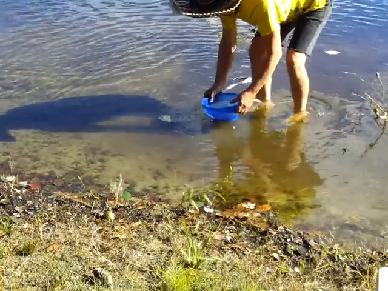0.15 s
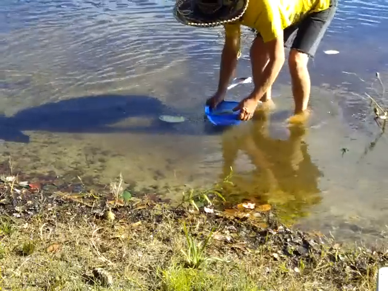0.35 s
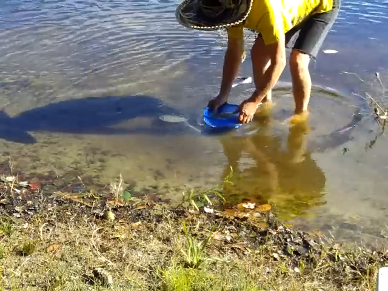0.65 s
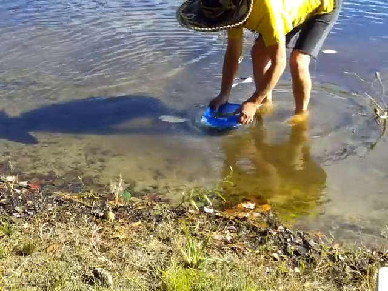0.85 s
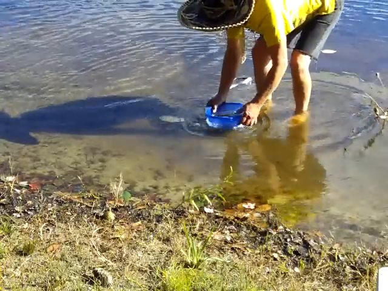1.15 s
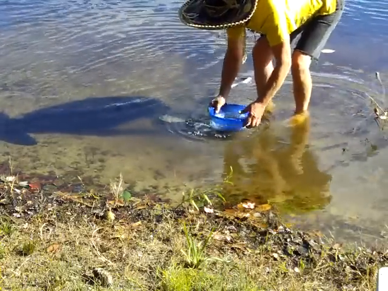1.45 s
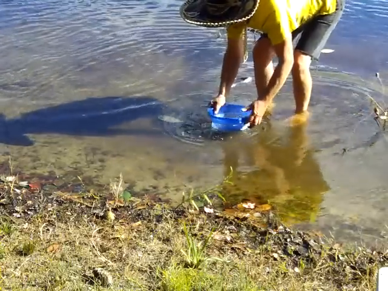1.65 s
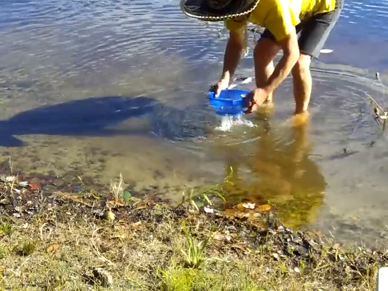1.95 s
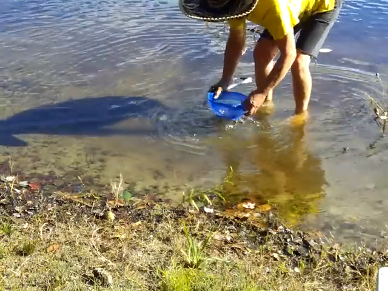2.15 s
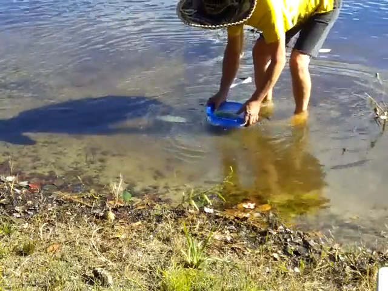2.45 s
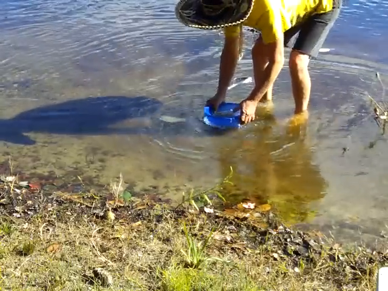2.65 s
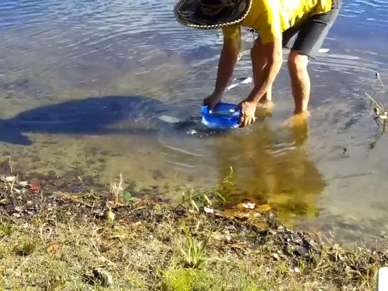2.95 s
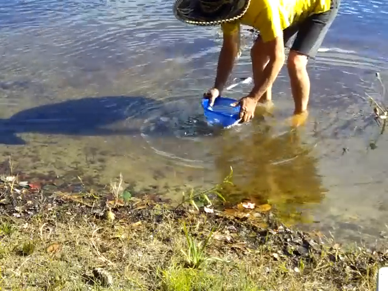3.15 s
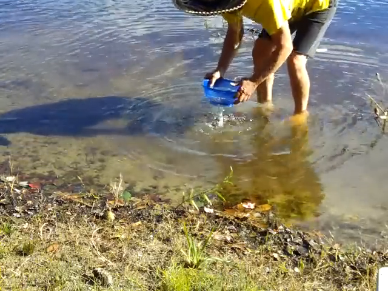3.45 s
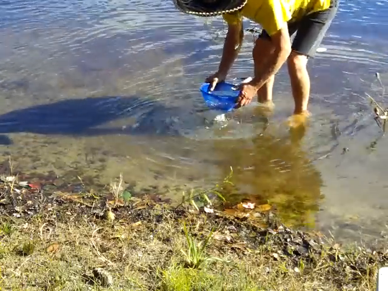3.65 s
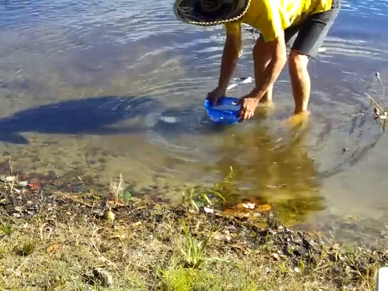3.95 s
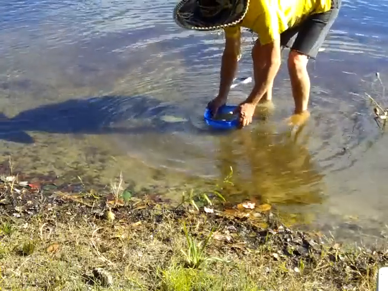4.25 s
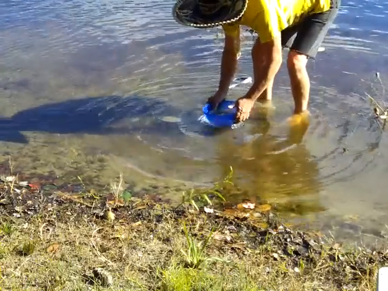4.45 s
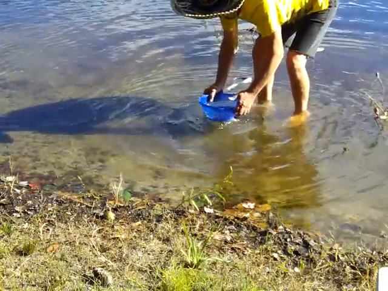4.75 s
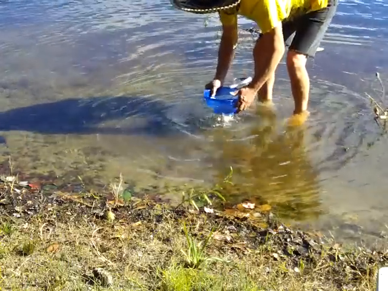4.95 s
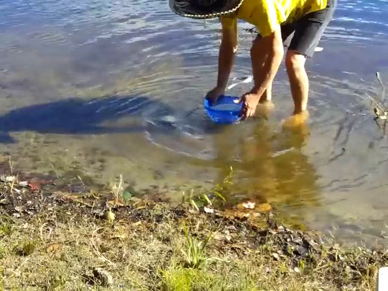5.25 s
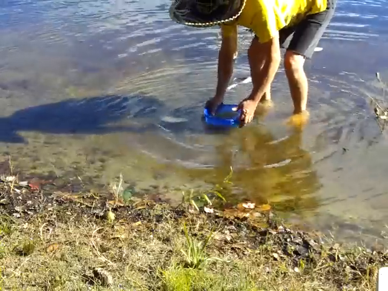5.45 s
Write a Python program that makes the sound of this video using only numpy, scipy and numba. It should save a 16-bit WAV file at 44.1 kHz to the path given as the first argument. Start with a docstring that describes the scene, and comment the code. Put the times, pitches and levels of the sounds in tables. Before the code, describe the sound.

A plastic colander of sand and gravel slaps into shallow lake water and is shaken in quick strokes. Stones rattle on the bowl, sand hisses and water gurgles. It is lifted, sounding brighter and dripping, then slaps back in three more times, with more shaking and sharp stone knocks between, ending in a few soft shakes. Faint, high crickets throb over a quiet outdoor wash, and the sound sits in the middle.

```python
"""A plastic colander of sand and gravel dips into shallow lake water with a slap and is shaken.
At each stroke gravel rattles on the bowl, sand hisses and water gurgles. Near 2 s it is lifted,
sounds brighter and drips. Three more times it slaps back in, with shaking and loud knocks between,
and it ends with a few soft shakes. All along, bush crickets throb over a quiet outdoor wash."""
import sys
import numpy as np
from scipy import signal
from scipy.fft import rfft, irfft
from scipy.io import wavfile
from scipy.ndimage import uniform_filter1d
from numba import njit

SR = 44100
rng = np.random.default_rng(int(sys.argv[2]) if len(sys.argv) > 2 else 0)


def store_wav(level_fs):
    """Save 16-bit WAV to argv[1]."""
    pcm = np.round(np.clip(np.atleast_2d(level_fs), -1, 1) * 32767)
    wavfile.write(sys.argv[1], SR, pcm.T.astype(np.int16))


N = 247634
t = np.arange(N) / SR

# tone of hissing sand and cracking stones: pitch_hz, gain_db
HISS_TONE = [(1200, -64), (2500, -7.5), (4000, 5.5), (6000, 2), (8500, 0.5), (11000, -5.5), (13000, -12.5),
             (15500, -29)]


def colander():
    """Gravel, sand and water move together in the shaken bowl."""
    # brightness of the load: time_s, brightness (0 dull and wet, 1 bright and drained)
    brightness_curve = [(0.0, 1), (0.2, 0.64), (0.45, 0.042), (0.75, 0.33), (1.05, 0.27), (1.3, 0.065),
                        (1.7, 0.3), (1.9, 0.85), (2.3, 0.37), (2.5, 0.079), (2.7, 0.52), (2.85, 0.11),
                        (3.2, 0.33), (3.38, 0.9), (3.9, .98), (4.2, .02), (4.6, 0.32), (4.9, 0.74),
                        (5.25, 0.91), (5.45, 0.023), (5.62, .02)]
    brightness = np.interp(t, *np.transpose(brightness_curve))
    gravel_gain, water_gain, sand_gain = shaking(brightness)
    hiss = undb(5.5) * sand_gain * sand(brightness)
    # the load moves in clumps, so its level flutters
    flutter = uniform_filter1d(uniform_filter1d(rng.standard_normal(N), size=400), size=400)
    load = undb(0.93 * unit(flutter)) * (gravel_gain * gravel(brightness) + hiss)
    sound = load + water_gain * water() + knocks() + drips() + spray()
    # small stones and bubbles give off no bass
    return signal.sosfilt(signal.butter(4, 608, "high", fs=SR, output="sos"), sound)


def shaking(brightness):
    """How loud gravel, water and sand are as the load is shaken, slides and slaps the water."""
    # one shake per row: time_s, level_db, half_length_ms
    shakes = [(0.087, -44, 24), (0.136, -46, 31), (0.541, -48, 34), (0.631, -45, 40), (0.73, -44, 32),
              (0.767, -45.5, 7), (0.822, -43.5, 20), (0.892, -41, 32), (0.986, -42, 8.3), (1.078, -37, 20),
              (1.158, -40.5, 12), (1.188, -38, 9), (1.252, -37, 18), (1.342, -40, 18), (1.426, -36, 23),
              (1.52, -39, 20), (1.605, -38.5, 31), (1.708, -37, 32), (1.777, -38.5, 26.6),
              (1.858, -48.5, 32), (2.383, -48, 48), (2.414, -44.5, 18), (2.468, -42.5, 27),
              (2.524, -45, 14), (2.652, -42, 12), (2.725, -38.5, 19), (2.79, -37.5, 19), (2.876, -38.5, 32),
              (2.968, -38, 22), (3.048, -37.5, 24.5), (3.153, -47.5, 59), (3.323, -46.5, 28),
              (3.375, -46.5, 15), (3.415, -34.5, 25.5), (3.482, -39.5, 28), (3.557, -39.5, 27),
              (3.637, -43, 18), (3.709, -37.5, 17.5), (3.788, -37, 26), (3.86, -38, 30), (3.935, -44.5, 18),
              (4.3, -49.5, 48), (4.403, -43.5, 35), (4.484, -42.5, 28), (4.578, -44, 36), (4.664, -43, 50),
              (4.742, -37, 24), (4.814, -32, 23), (4.857, -41, 9.2), (4.898, -35, 28), (4.967, -31.5, 14),
              (5.02, -42, 61), (5.124, -37.5, 24.4), (5.191, -47.5, 25), (5.227, -52, 22), (5.483, -49, 23),
              (5.575, -47, 49)]
    # the load keeps sliding between shakes: start_s, end_s, start_db, end_db
    slides = [(0.0, 0.18, -47, -50), (0.692, 1.75, -47, -45.5), (2.48, 3.148, -44, -44.5),
              (3.505, 3.86, -43.5, -42.5), (4.453, 4.973, -49.5, -37), (5.376, 5.62, -53, -55.5)]
    # the lowered bowl hits the water and the load jolts: time_s, level_db
    landings = [(0.246, -42), (2.293, -45), (3.987, -44.5), (5.285, -42)]
    # water sloshing through the holes, compared with the gravel: time_s, level_db
    sloshing = [(0.0, -17), (0.2, -7.5), (0.6, -6.5), (1.0, -9), (1.7, -9.5), (1.9, -5.5), (2.35, -9.5),
                (2.5, -14.5), (2.65, -10), (2.95, -11), (3.2, -5), (3.4, -18.5), (3.8, -20.5), (3.95, -7),
                (4.6, -7), (4.7, -9.5), (4.82, -4), (4.95, -18.5), (5.12, -22), (5.2, -3), (5.62, -9.5)]
    slide_db = np.full(N, -58.5)  # the load at rest
    for start, end, start_db, end_db in slides:
        fade_db = 104 * (start - t).clip(0) + 91 * (t - end).clip(0)  # gathers, then settles
        slide_db = np.maximum(slide_db, np.interp(t, [start, end], [start_db, end_db]) - fade_db)
    slide, strokes = power(slide_db), swells(shakes)
    slaps = swells([(at, db, 15) for at, db in landings])
    for at, db in landings:  # the splash falls back, fading 60 dB in 0.32 s
        slaps += (t > at) * power(db - 7.5 - 60 * (t - at).clip(0) / 0.32)
    water_db = np.interp(t, *np.transpose(sloshing))
    sand_db = -15.5 + 10.5 * brightness
    # sliding sloshes more and hisses less than a stroke
    water_power = power(water_db) * (strokes + power(2.5) * slide) + power(-8.5) * slaps
    sand_power = power(sand_db) * (strokes + power(-3.5) * slide) + power(-7.5) * slaps
    return np.sqrt([slide + strokes + slaps, water_power, sand_power])


def gravel(brightness, count=30000):
    """Stones tick on each other and ring the bowl, which rings higher when the load is bright."""
    # tone of the ticks: pitch_hz, gain_db
    tick_tone = [(500, -60.5), (1200, -2.5), (1550, -0.5), (1800, -12.5), (2200, 3.5), (3000, 3),
                 (4500, -1.5), (6500, -12), (10000, -28)]
    when, length, size = rng.random((count, 3)).T
    base_hz = 1650 + 110 * rng.standard_normal(count) + 300 * brightness[(when * N).astype(int)]
    hz = base_hz * 2 ** (0.445 * rng.exponential(1, count)).clip(0, 2.5)
    bowl = rings(when * N / SR, hz, cycles=4 + 6 * length, db=-2.8 * np.log(size))
    ticks = colour(impacts(per_s=9000, spread_db=3.0), tick_tone)
    return unit(ticks + undb(0.5) * unit(bowl))


def sand(brightness):
    """Tiny impacts blur into a hiss; drained grains tick sharper and add treble."""
    hiss = colour(impacts(per_s=15000, spread_db=3.5), HISS_TONE)
    treble = np.diff(hiss, n=2, prepend=[0, 0])
    return hiss + undb(-19.5) * brightness * treble


def water(count=6000):
    """Bubbles trapped by the sloshing ring, rising in pitch as they fade."""
    when, length, size = rng.random((count, 3)).T
    hz = 1060 * 2 ** (0.321 * rng.standard_normal(count))
    db = -2.2 * np.log(size).clip(-4)
    return unit(rings(when * N / SR, hz, cycles=3.9 + 4 * length, db=db, rise=0.109))


def knocks():
    """Single stone knocks and a few low plops, each with a short ring."""
    # start_s, ring_db, pitch_hz, crack_above_ring_db
    knocks_and_plops = [(0.025, -33, 2430, -8), (0.24, -33, 4200, -2), (0.252, -27, 3580, -12),
                        (0.762, -39, 1670, -16), (1.19, -33.5, 910, -15), (1.841, -35, 970, -12),
                        (1.894, -34, 2180, 0), (2.007, -43, 2690, -3), (2.104, -38.5, 2620, -3),
                        (2.284, -29, 2920, -20), (2.295, -29, 2670, -3), (2.655, -25, 2290, -21),
                        (2.723, -26, 1820, -26), (2.881, -20.5, 1900, -29), (3.034, -25, 2000, -24),
                        (3.152, -36, 2400, -1), (3.159, -35, 1900, -15), (3.397, -41, 2300, -4),
                        (3.989, -28.5, 2840, -2), (4.826, -24.5, 1090, -6), (4.857, -22, 2450, -8),
                        (4.889, -33, 2220, 2), (4.913, -42, 2100, -17), (4.968, -26, 2290, -13),
                        (5.268, -34, 1800, -18), (5.421, -42, 2500, -4), (5.476, -33, 2200, -15)]
    start_s, db, hz, crack_db = np.transpose(knocks_and_plops)
    hits = np.zeros(N)
    hits[(start_s * SR).astype(int)] = undb(db + crack_db)
    fades = signal.lfilter([1], [1, -np.exp(-1 / (0.0023 * SR))], hits)
    cracks = fades * colour(rng.standard_normal(N), HISS_TONE)
    return cracks + rings(start_s, hz, cycles=3.05, db=db)


def drips():
    """Drops fall from the bowl and plink on the water."""
    # start_s, level_db, pitch_hz
    drops = [(2.107, -39, 3120), (2.146, -43, 3050), (2.157, -42, 3960), (2.170, -44, 3360),
             (2.168, -64, 630), (5.378, -43, 2500)]
    start_s, db, hz = np.transpose(drops)
    return rings(start_s, hz, cycles=7.4, db=db, rise=0.073)


def spray(per_s=77):
    """Fine droplets and bursting foam make faint, high ticks on the surface."""
    when, pitch, size = rng.random((int(per_s * N / SR), 3)).T
    hz = 7000 * 2 ** (.95 * pitch)
    return undb(-74) * unit(rings(when * N / SR, hz, cycles=2.5, db=-5 * np.log(size).clip(-4)))


def echo(sound, fade_s=0.23):
    """Legs, water surface and bank scatter the sound into a short tail."""
    tail = rng.standard_normal(4000) * undb(-60 * t[:4000] / fade_s)
    return undb(-15.5) * signal.fftconvolve(sound, tail / np.linalg.norm(tail))[:N]


def crickets(throb_hz=51.914):
    """Two crickets' wings ring in regular throbs, each throb a little off in pitch and level."""
    # pitch_hz, pitch_spread_hz, level_db
    insects = [(8330, 36.3, -58), (7960, 120, -65)]
    out = 0
    for k, (hz, spread_hz, db) in enumerate(insects):
        turns = (t - .0122) * throb_hz + 1.5 - .28 * k  # the fainter insect lags
        detune, extra_db = rng.standard_normal((int(turns[-1]) + 1, 2))[turns.astype(int)].T
        wing = np.sin(np.cumsum(2 * np.pi * (hz + spread_hz * detune) / SR))
        rasp = 1 + .25 * unit(uniform_filter1d(rng.standard_normal(N), size=60))
        throb = np.exp(-((turns % 1 - .5) / .23) ** 2)
        out = out + undb(db + extra_db) * unit(wing * rasp * throb)
    return out


def air():
    """A steady outdoor wash with two very faint, high tones."""
    # pitch_hz, gain_db
    wash_tone = [(25, -23), (45, -22), (75, -14), (93, -10), (101, -8.5), (110, -15), (140, -16.5),
                 (250, -11.5), (385, -4.5), (1000, -5.5), (1500, -4.5), (3000, -22), (6900, -11.5),
                 (10000, -14), (12000, -29), (15500, -20)]
    wash = undb(-59.5) * colour(rng.standard_normal(N), wash_tone, size=4096)
    whine = undb(-81) * np.sin(2 * np.pi * 14985 * t) + undb(-84) * np.sin(2 * np.pi * 9990 * t)
    return wash + whine


def side_noise():
    """Faint, steady noise that differs between left and right and adds width."""
    # pitch_hz, gain_db
    side_tone = [(80, -51), (300, -4), (700, 3), (2000, -27.5), (9000, -26), (15000, -12)]
    return undb(-82) * colour(rng.standard_normal(N), side_tone)


def undb(db):
    return 10 ** (np.asarray(db) / 20)


def power(db):
    return undb(2 * db)


def unit(x):
    return x / np.sqrt(np.mean(x ** 2))


def colour(x, tone, size=1024):
    """Give x a tone and an average level of 1."""
    hz, db = np.transpose(tone)
    bin_hz = np.arange(size // 2 + 1) * SR / size + 1
    log_gain = np.log(undb(np.interp(np.log(bin_hz), np.log(hz), db)))
    # fold the filter in time so it rings only after a tick
    folded = irfft(log_gain)
    folded[1:size // 2] *= 2
    folded[size // 2 + 1:] = 0
    return unit(signal.fftconvolve(x, irfft(np.exp(rfft(folded))))[:N])


def swells(rows):
    """Add up the power of short, rounded swells."""
    total = np.zeros(N)
    for at, db, half_ms in rows:
        near = np.abs(t - at) < .12
        total[near] += power(db) * np.exp(-np.abs((t[near] - at) * 1000 / half_ms) ** 3.05)
    return total


def impacts(per_s, spread_db):
    """Random ticks, many small and a few large."""
    hit = rng.random(N) < per_s / SR
    return hit * rng.choice([-1, 1], N) * undb(spread_db * np.minimum(rng.exponential(1, N), 6.5))


def rings(start_s, hz, cycles, db, rise=0):
    """Pings that fade to 37% in `cycles` waves, while their pitch climbs by the share `rise`."""
    life = cycles * SR / hz
    start = (start_s * SR).astype(np.int64)
    return fading_sines(N, start, 2 * np.pi * hz / SR, np.exp(-1 / life), (1 + rise) ** (1 / life), undb(db))


@njit
def fading_sines(n, start, step, decay, glide, size):
    """Add up short, gliding tones, sample by sample."""
    out = np.zeros(n)
    for k in range(len(start)):
        level, phase, speed, i = size[k], 0., step[k], start[k]
        while level > size[k] * .005 and i < n:
            out[i] += level * np.sin(phase)
            phase += speed
            speed = min(speed * glide[k], 2.8)
            level *= decay[k]
            i += 1
    return out


def scene():
    """Everything sits in the middle except the faint side noise."""
    bowl = colander()
    middle = bowl + echo(bowl) + air() + crickets()
    side = side_noise()
    return np.array([middle + side, middle - side])


def record(dry, top_hz=15300):
    """Cut the very highest treble."""
    return signal.sosfilt(signal.ellip(10, .2, 70, top_hz, fs=SR, output="sos"), dry)


dry = scene()
out = record(dry)
store_wav(out)
```